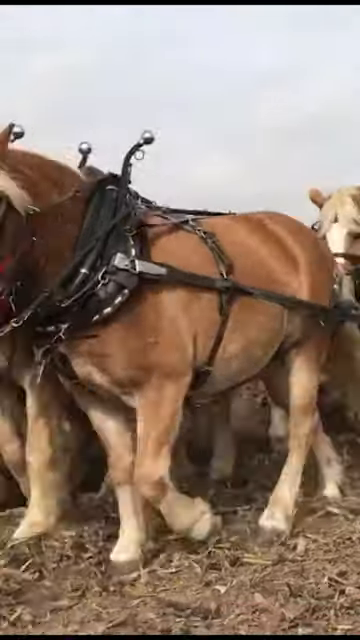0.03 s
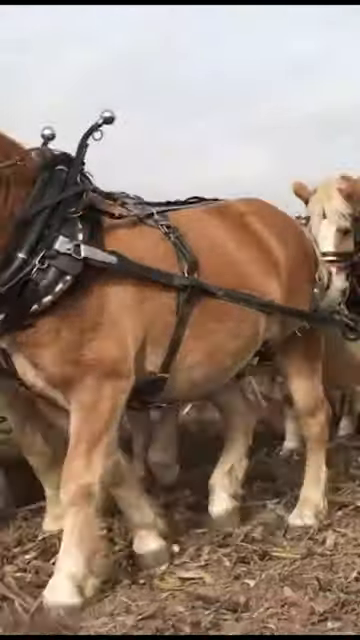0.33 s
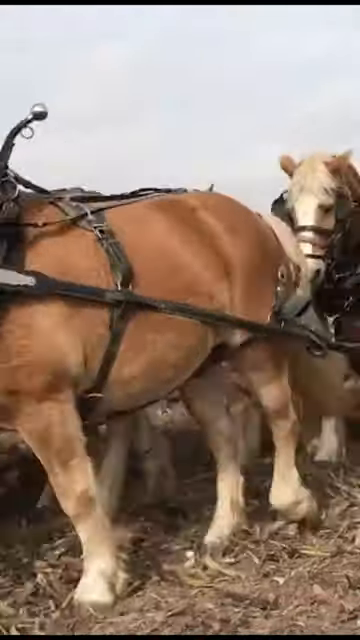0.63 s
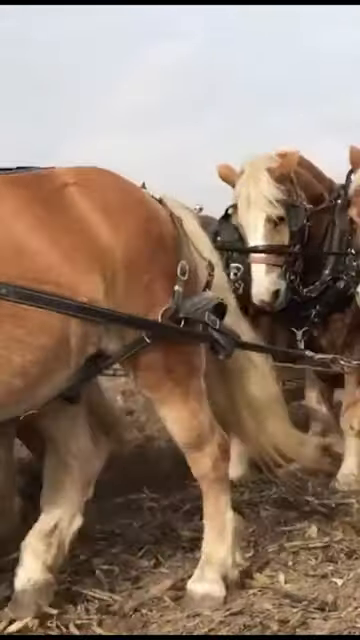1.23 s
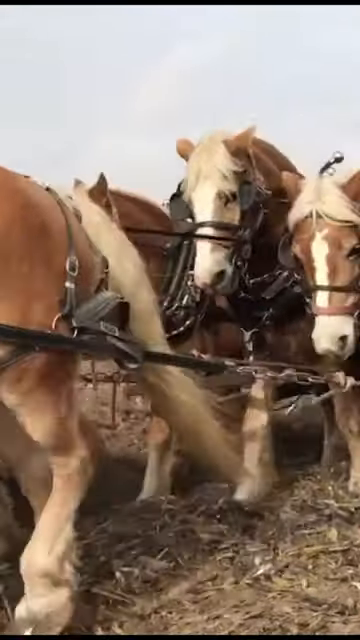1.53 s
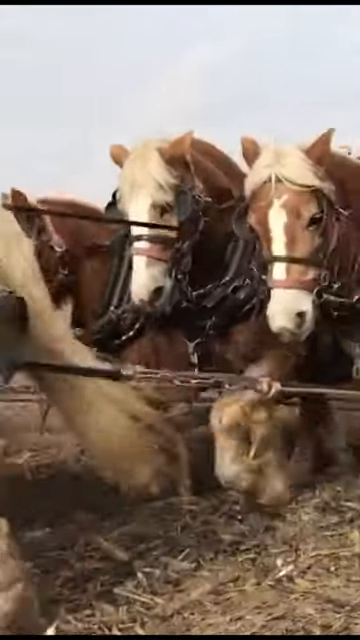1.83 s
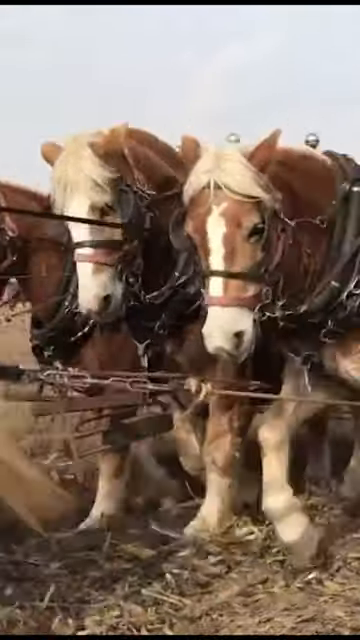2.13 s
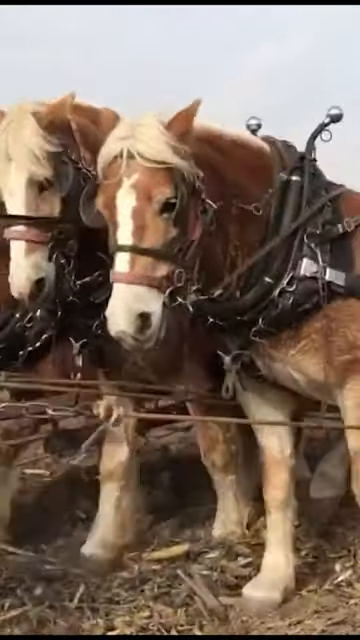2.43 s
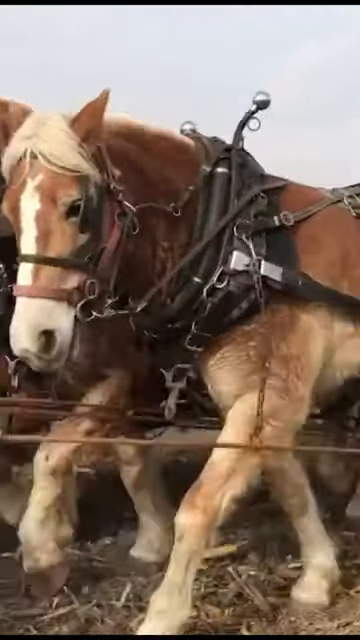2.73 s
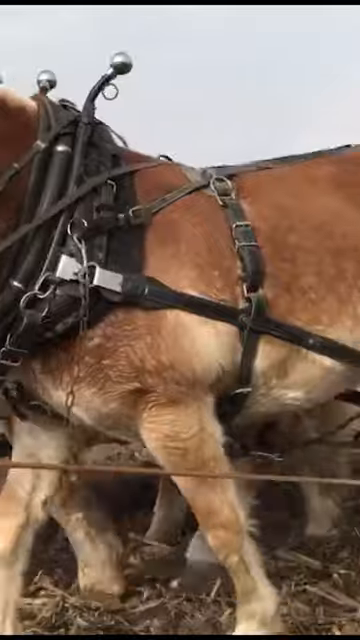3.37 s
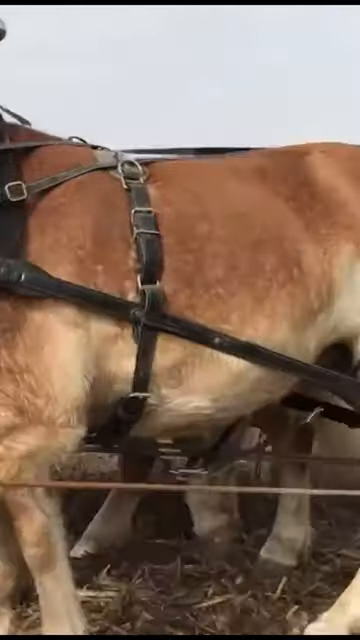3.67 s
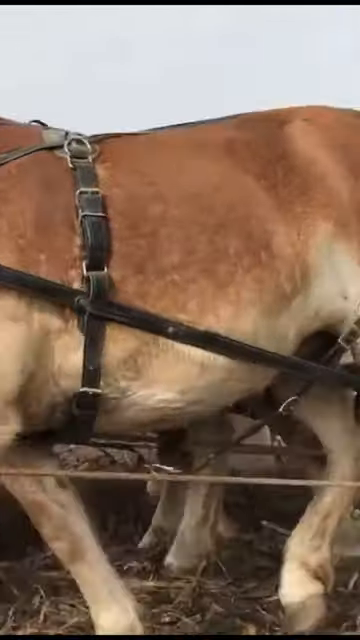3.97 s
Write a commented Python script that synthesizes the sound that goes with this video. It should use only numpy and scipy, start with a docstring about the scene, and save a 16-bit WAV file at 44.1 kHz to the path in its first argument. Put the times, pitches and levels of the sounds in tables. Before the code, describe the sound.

Steel harness rings, buckles and chains jingle as draught horses walk close by in an open field. Dry stubble rustles and snaps, a few soft hoof thuds land early, and wind buffets the microphone harder towards the end.

```python
"""Wind flutters on the microphone and dry corn stubble rustles as a team of draught horses walks close by.
Stalks crackle and snap under soft hoof thuds. Steel rings, buckles and chains on the harness strike
and chafe with the stride, the rest of the team jingling faintly behind them. Out in the open field,
gusts rumble and single eddies slap the microphone port, harder towards the end."""
import sys
import numpy as np
from scipy import signal
from scipy.fft import rfft, irfft
from scipy.io import wavfile

SR = 44100
rng = np.random.default_rng(int(sys.argv[2]) if len(sys.argv) > 2 else 0)


def store_pcm(level_fs):
    """Save levels as 16-bit WAV."""
    pcm = np.round(np.clip(level_fs, -1, 1) * 32767).astype(np.int16)
    wavfile.write(sys.argv[1], SR, np.atleast_2d(pcm).T)


N = 176400


def amp(db):
    """Decibels to gain."""
    return 10 ** (np.asarray(db) / 20)


def unit(x):
    """Scales to rms 1."""
    return x / np.sqrt(np.mean(x ** 2) + 1e-20)


def add(mix, start_s, sound):
    """Mixes a sound in at start_s."""
    part = mix[max(round(start_s * SR), 0):][:len(sound)]
    part += sound[:len(part)]


def colour(x, points):
    """Filters by a spectrum of (freq_hz, gain_db) points, keeping the power of white noise."""
    hz, db = np.transpose(points)
    curve_db = np.interp(np.log(np.fft.rfftfreq(N, 1 / SR) + 1), np.log(hz), db)
    return irfft(rfft(x) * unit(amp(curve_db)), N)


def wander(hz):
    """A smooth random curve of rms 1 that moves at rates up to about hz."""
    rolloff = np.exp(-(np.fft.rfftfreq(N, 1 / SR) / hz) ** 2)
    return unit(irfft(rfft(rng.standard_normal(N)) * rolloff, N))


def swell(peak_s, half_length_s):
    """A bell-shaped rise and fall around peak_s."""
    return np.exp(-np.minimum(((np.arange(N) / SR - peak_s) / half_length_s) ** 2, 50))


def struck_steel(modes, detune=0.00287):
    """One contact on a steel part; no two parts are tuned quite alike, and chafing roughens the tone."""
    attack_s, chafe_hz, chafe_rad = 0.00036, 124, 0.86
    t = np.arange(SR // 4) / SR
    knots, tone = np.arange(256), 0
    for hz, db, t60_s in modes:
        bend, flicker = (np.interp(t * chafe_hz, knots, row) for row in rng.standard_normal((2, 256)))
        turns = hz * (1 + detune * rng.uniform(-1, 1)) * t + rng.random()
        envelope = amp(db - 60 * t / t60_s) * (1 + flicker)
        tone = tone + envelope * np.sin(2 * np.pi * turns + chafe_rad * bend)
    return tone * (1 - np.exp(-t / attack_s))


# Air of the open field, all around the microphone: freq_hz, gain_db
FIELD_SPECTRUM = [(30, 7.5), (100, -16), (300, -42), (600, -7), (1200, -8), (2200, -29), (5000, -30),
                  (16000, -82)]


def field_hush():
    """The steady, low hush of open ground."""
    return amp(-47.5) * colour(rng.standard_normal(N), FIELD_SPECTRUM)


# Gusts reaching the microphone: peak_s, flutter_drive_db, rumble_db, half_length_s
WIND_GUSTS = [(0.077, -31.5, -34, 0.044), (1.754, -31.5, -24, 0.053), (1.842, -27, -33, 0.026),
              (2.003, -32, -28, 0.094), (2.32, -33, -34, 0.021), (2.42, -36, -32.5, 0.032),
              (2.522, -34, -34.5, 0.073), (2.701, -31.5, -26, 0.042), (2.799, -32, -36, 0.04),
              (2.942, -36.5, -20, 0.033), (3.197, -27.5, -16.5, 0.059), (3.316, -28, -19, 0.065),
              (3.533, -25, -16.5, 0.098), (3.725, -25, -17, 0.059), (3.886, -28, -22, 0.051)]
# Wind rumble on the microphone: freq_hz, gain_db
RUMBLE_SPECTRUM = [(12, -45), (25, -63), (42, -3.5), (62, -0.5), (100, -3.5), (150, -9), (250, -14.5),
                   (600, -67)]
# Bands of wind flutter on the microphone: centre_hz, offset_db, growth_db_per_db, burst_db
FLUTTER_BANDS = [(200, 3, 1.02, 4.5), (398, 1, 1.02, 4), (800, -4.5, 1.24, 8), (1290, -34, 4.95, 2)]


def wind():
    """Wind on the microphone: a rumble, and a flutter that comes in bursts and brightens with each gust."""
    breeze_db, breeze_rumble_db, reference_db = -53.5, -38.5, -27
    eddies = np.clip(wander(hz=115), -2, 2)
    push, rumble_power = amp(breeze_db), amp(breeze_rumble_db) ** 2
    for peak_s, drive_db, rumble_db, half_length_s in WIND_GUSTS:
        push += amp(drive_db) * swell(peak_s, half_length_s)
        rumble_power += (amp(rumble_db) * swell(peak_s, 1.51 * half_length_s)) ** 2  # outlasts the push
    gust_db = 20 * np.log10(push) - reference_db
    out = np.sqrt(rumble_power) * colour(rng.standard_normal(N), RUMBLE_SPECTRUM)
    for hz, offset_db, growth, burst_db in FLUTTER_BANDS:
        shape = [(hz / 3, -30), (hz / 1.35, 0), (hz * 1.25, -3), (hz * 2, -22), (hz * 5, -70)]
        band = colour(rng.standard_normal(N), shape)
        bursts = unit(amp(burst_db * eddies))
        out += amp(reference_db + offset_db + growth * gust_db) * bursts * band
    return out


def stalk_crackle(cracks_per_s=1400, spread_db=5.5, decay_cycles=1.3):
    """Dry stalks crack in tiny high pings, and each one shakes its neighbours."""
    tail_s, tail_db = 0.0037, 4.5
    cracks = amp(spread_db * np.minimum(rng.exponential(1, N), 4.5)) * rng.choice([-1, 1], N)
    cracks *= rng.random(N) < cracks_per_s / SR
    stalk = rng.integers(0, 24, N)
    out, t = np.zeros(N), np.arange(SR // 100) / SR
    for k, hz in enumerate(np.linspace(4000, 15500, 24)):
        ping = np.exp(-t * hz / decay_cycles) * np.sin(2 * np.pi * hz * t)
        out += signal.oaconvolve(cracks * (stalk == k), unit(ping))[:N]
    shake = rng.standard_normal(SR // 25)
    shake *= np.exp(-np.arange(len(shake)) / SR / tail_s)
    return unit(out + amp(tail_db) * signal.oaconvolve(out, shake / np.linalg.norm(shake))[:N])


# Hooves and legs scuffing through the stubble, close by: peak_s, effort_db, half_length_s
LEG_SCUFFS = [(0.333, -52.5, 0.24), (0.655, -47, 0.027), (0.74, -45.5, 0.027), (0.876, -49.5, 0.2),
              (0.91, -45, 0.013), (1.115, -51, 0.19), (1.275, -48, 0.064), (1.475, -52.5, 0.15),
              (1.812, -50, 0.17), (2.083, -50.5, 0.066), (2.35, -48, 0.082), (2.748, -45.5, 0.034),
              (3.004, -54.5, 0.6), (3.326, -48, 0.075), (3.796, -50, 0.17)]
# Dry stubble rustling at ground level: freq_hz, gain_db
RUSTLE_SPECTRUM = [(300, -47), (1200, 2), (2300, -3), (3400, 1.5), (4600, -2.5), (6200, 1), (7500, -4.5),
                   (9000, -0.5), (10400, -6), (12300, -1), (16000, -8)]


def stubble(team_effort_db=-53.5):
    """Stalks rustle and crackle in clumps with each scuff, over the steady rustle of the other horses."""
    rustle = amp(5) * stalk_crackle() + amp(5.5) * rng.standard_normal(N)
    scuff_power = sum((amp(db) * swell(peak_s, half_s)) ** 2 for peak_s, db, half_s in LEG_SCUFFS)
    effort = np.sqrt(amp(team_effort_db) ** 2 + scuff_power)
    clumps = amp(1.5 * wander(hz=70))
    return colour(rustle * effort * clumps, RUSTLE_SPECTRUM)


def link_tinkles(touches_per_s=40, level_db=-55, spread_db=5.5, t60_s=0.23):
    """Small chain links of many sizes touch at random, each with a short note and its overtone."""
    out = np.zeros(N)
    for when, size, force in rng.random((round(touches_per_s * N / SR), 3)):
        pitch_hz = 5000 + 1000 * size
        modes = [(pitch_hz, 0, t60_s), (pitch_hz * 1.98, -3, t60_s)]
        add(out, when * N / SR, amp(level_db + spread_db * (2 * force - 1)) * struck_steel(modes))
    return out


# Single eddies right at the microphone port: centre_s, level_db, brightness_hz
EDDY_SLAPS = [(0.058, -16.5, 408), (1.678, -12, 200), (1.732, -18, 650), (1.748, -15.5, 960),
              (1.806, -17, 600), (1.82, -13.5, 800), (2.084, -21, 590), (2.159, -16, 486),
              (2.168, -12, 696), (2.426, -15, 645), (2.643, -13.5, 560), (2.653, -12.5, 500),
              (2.683, -7, 705), (2.746, -10.5, 615), (2.778, -17.5, 800), (3.021, -12.5, 200),
              (3.157, -19, 635), (3.202, -9, 345), (3.256, -11, 550), (3.302, -12.5, 680),
              (3.342, -11.5, 650), (3.354, -8.5, 650), (3.472, 0.5, 316), (3.484, 0, 605),
              (3.538, -11.5, 333), (3.591, -11, 784), (3.619, -12, 700), (3.63, -8, 637), (3.695, -8, 616),
              (3.717, -9, 1110), (3.729, -7.5, 644), (3.865, -9.5, 540)]


def eddy_slaps(lead_s=0.02, wake_db=-2.5, wake_cycles=2.14):
    """An eddy crosses the microphone port: one dull swing of pressure and a short turbulent wake."""
    out, t = np.zeros(N), np.arange(SR // 10) / SR - lead_s
    for centre_s, db, hz in EDDY_SLAPS:
        phase = 2 * np.pi * hz * t
        swing = 2 * phase / (1 + (phase / 2) ** 2) ** 3 * np.exp(-(phase / 5) ** 2) / 1.36
        wake_filter = signal.butter(4, min(hz * 1.2, 8000), fs=SR, output="sos")
        wake = unit(signal.sosfilt(wake_filter, rng.standard_normal(len(t))))
        wake *= np.exp(-abs(t) * hz / wake_cycles * np.where(t < 0, 3, 1))  # builds faster than it dies
        dull = signal.butter(3, min(hz * 3.14, 8000), fs=SR, output="sos")
        add(out, centre_s - lead_s, amp(db) * signal.sosfiltfilt(dull, swing + amp(wake_db) * wake))
    return out


# Stalks breaking underfoot, close by: start_s, level_db, decay_s
STALK_SNAPS = [(0.142, -26.5, 0.0078), (0.305, -31, 0.018), (0.649, -35, 0.0059), (0.73, -27, 0.0024),
               (0.749, -14.5, 0.00056), (1.458, -30.5, 0.0064), (1.746, -20, 0.00073),
               (2.0985, -27, 0.0036), (2.1044, -25, 0.0085), (3.339, -27, 0.0048)]
# A dry stalk's snap at close range: freq_hz, gain_db
SNAP_SPECTRUM = [(500, 0), (2000, -11), (3400, 2.5), (6000, -0.5), (10000, 3.5), (16000, 1)]


def stalk_snaps():
    """Now and then a stalk breaks with a sharp burst of noise."""
    out, t = np.zeros(N), np.arange(SR // 16) / SR
    for start_s, db, decay_s in STALK_SNAPS:
        add(out, start_s, amp(db) * np.exp(-t / decay_s) * rng.standard_normal(len(t)))
    return colour(out, SNAP_SPECTRUM)


# Links, buckles and heavy trace chains striking on the near harness: start_s, level_db
LINK_KNOCKS = [(.1435, -29.5), (3.478, -37.5)]
BUCKLE_CLINKS = [(.227, -31), (.265, -38.5), (.622, -35), (3.478, -40)]
TRACE_CLANKS = [(.533, -29.5), (1.355, -27), (1.54, -31.5)]
# Resonances of a link, a buckle and a trace chain: pitch_hz, level_db, t60_s
LINK_TONES = [(5200, -7, .05), (11850, -2, .06), (12550, -3, .04)]
BUCKLE_TONES = [(5860, -4, .24), (9640, -11, .3), (10830, -1, .15), (15040, -6, .24), (15540, -9, .18)]
TRACE_TONES = [(2330, -10, .03), (3350, -5, .04), (4400, -8, .025)]


def harness_fittings():
    """Links knock, buckles clink and trace chains clank, each ringing with its own modes."""
    out = np.zeros(N)
    parts = (LINK_KNOCKS, LINK_TONES), (BUCKLE_CLINKS, BUCKLE_TONES), (TRACE_CLANKS, TRACE_TONES)
    for hits, modes in parts:
        for start_s, db in hits:
            add(out, start_s, amp(db) * struck_steel(modes))
    return out


# Rings striking on the near harness, a level for each mode group:
# start_s, level_13400hz_db, level_5000hz_db, level_10000hz_db, level_10900hz_db
RING_STRIKES = [(0.1886, -43, -47, -37, -53), (0.554, -30, -39, -37.5, -38), (0.9444, -57, -40, -54, -43),
                (1.0116, -24, -41, -42, -34), (1.398, -30, -45, -34.5, -51), (1.6771, -29, -39, -46, -32),
                (1.6974, -50, -30, -39, -35), (2.111, -33, -52, -58, -47), (2.36, -31, -39, -43.5, -40),
                (2.534, -31, -38, -40, -43), (2.551, -26, -46, -31.5, -43), (2.5595, -21, -35.5, -30, -29),
                (2.582, -27, -61, -34, -44), (2.6022, -33, -42, -41, -34), (2.7367, -33, -46, -35, -40),
                (3.11, -48, -48, -48, -46), (3.1424, -32, -38, -44, -30), (3.1812, -34, -33.5, -50, -26),
                (3.6167, -45, -50, -63, -34)]
# Resonances of the steel rings, in the same four groups: pitch_hz, level_db, t60_s
RING_TONES = [
    [(13370, -2, .16), (13660, -10, .12)],
    [(5030, -2, .16), (5170, -3, .11), (5480, -4, .11)],
    [(10020, -1.5, .3), (9890, -7, .16)],
    [(10910, -3, .14)],
]
# Rings on the rest of the team, farther off, one entry for each group: level_db
TEAM_RING_DB = [-51, -52, -53, -53]


def harness_rings(rattle_s=0.037, tick_decay_s=0.0025, team_strikes_per_s=19):
    """Each swing strikes a ring, which rattles and ticks on its neighbours; others jingle faintly."""
    out, t = np.zeros(N), np.arange(SR // 50) / SR
    for start_s, *levels in RING_STRIKES:
        bounces = (np.arange(5) + rng.random(size=5)) / 5  # fractions of the rattle's length
        contacts = [(0, 0, -21)] + [(rattle_s * part, -4.5 - 21 * part, -6) for part in bounces]
        for delay_s, force_db, tick_db in contacts:
            tone = sum(amp(db + force_db) * struck_steel(modes) for modes, db in zip(RING_TONES, levels))
            tick = np.exp(-t / tick_decay_s) * rng.standard_normal(len(t))
            add(out, start_s + delay_s, tone)
            add(out, start_s + delay_s, amp(max(levels) + force_db + tick_db) * tick)
    for start_s in rng.uniform(0, N / SR, round(team_strikes_per_s * N / SR)):
        for modes, db in zip(RING_TONES, TEAM_RING_DB):
            add(out, start_s, amp(db + rng.normal(0, 2.6)) * struck_steel(modes, detune=0.0096))
    return out


# Hooves landing near the microphone: start_s, level_db
HOOF_FALLS = [(0.309, -26), (0.501, -32), (0.687, -24), (0.85, -27.5)]
# A thud in the field's soft soil: freq_hz, gain_db
THUD_SPECTRUM = [(30, -1), (90, 8), (250, -2.5), (500, -16.5), (1500, -24), (5000, -69)]


def hooves(rise_s=0.0071, decay_s=0.0086):
    """Each hoof presses into soft soil with a dull thud."""
    push, t = np.zeros(N), np.arange(SR // 4) / SR
    for start_s, db in HOOF_FALLS:
        add(push, start_s, amp(db) * np.minimum(t / rise_s, np.exp((rise_s - t) / decay_s)))
    return push * colour(rng.standard_normal(N), THUD_SPECTRUM)


def scene():
    """Wind, feet and harness over the hush of the field, at one mono microphone."""
    air = field_hush() + wind() + eddy_slaps()
    feet = stubble() + stalk_snaps() + hooves()
    harness = link_tinkles() + harness_fittings() + harness_rings()
    return (air + feet + harness)[None]


def record(dry):
    """The microphone loses the deepest bass, softly limits the strongest buffets and cuts the very top."""
    low_cut_hz, ceiling, high_cut_hz = 30, 0.75, 15900
    thinned = signal.sosfilt(signal.butter(4, low_cut_hz, "highpass", fs=SR, output="sos"), dry)
    limited = ceiling * np.tanh(thinned / ceiling)
    high_cut = signal.firwin(511, high_cut_hz, window=("kaiser", 9), fs=SR)
    return signal.oaconvolve(limited, high_cut[None], "same")


dry = scene()
out = record(dry)
store_pcm(out)
```